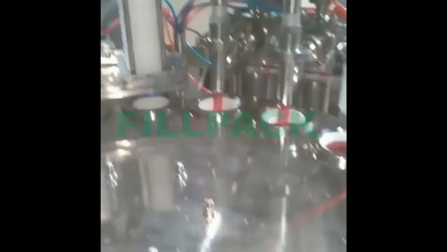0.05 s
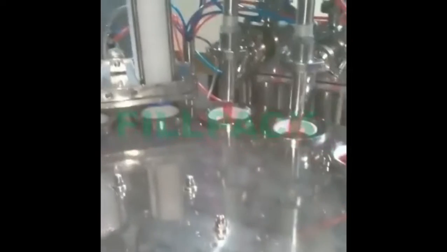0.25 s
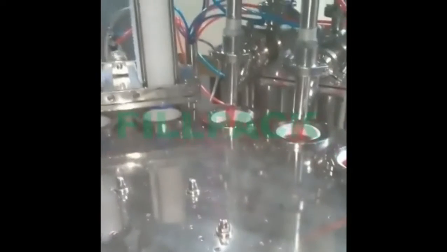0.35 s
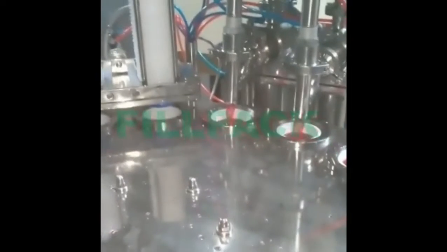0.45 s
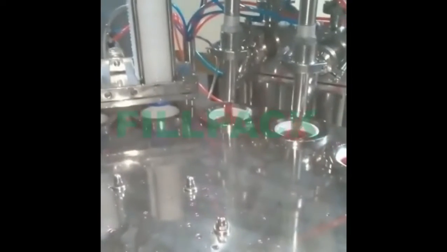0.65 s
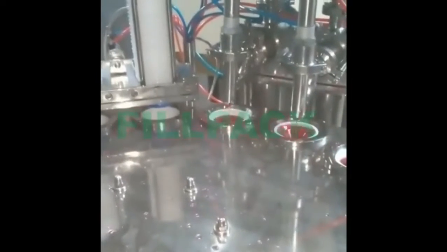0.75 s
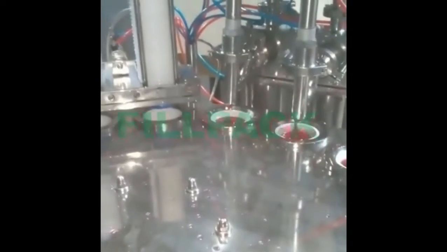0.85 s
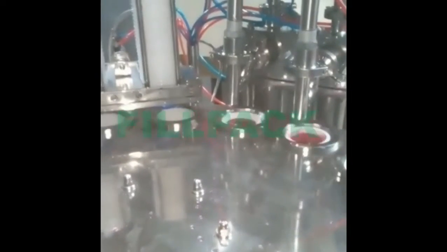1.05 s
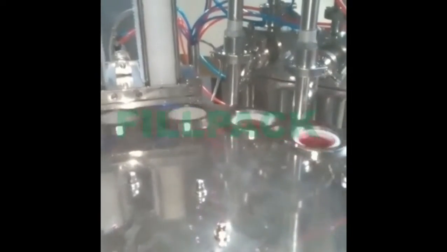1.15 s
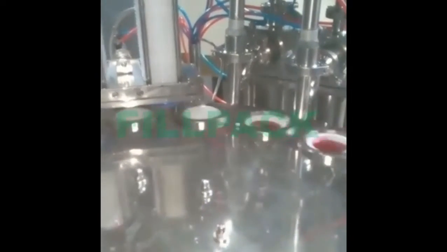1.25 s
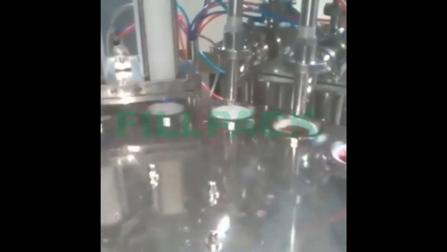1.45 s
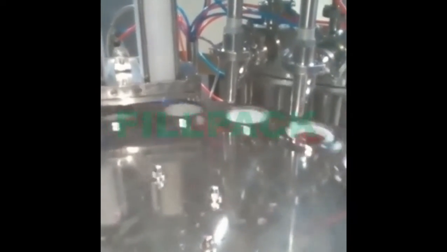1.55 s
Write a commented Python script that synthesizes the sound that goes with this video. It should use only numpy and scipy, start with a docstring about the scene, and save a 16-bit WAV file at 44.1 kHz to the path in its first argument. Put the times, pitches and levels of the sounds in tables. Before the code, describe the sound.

A filling and sealing machine clanks and hisses compressed air over a steady low factory hum

```python
"""Out of a quick fade-in come a factory hall's noise and hum, a rumbling drive and whistling bled air.
An automatic filling and sealing machine works close by: thuds through its base are soft low rings,
cylinders clunk on stops as rattling contacts ring steel modes under a noise crack, and air spits.
Two valves exhaust as bright shaped noise with gliding whistles; only the blows and spits echo.
One microphone hears it all, with the deepest bass and the extreme top cut."""
import sys
import numpy as np
from scipy import signal
from scipy.fft import rfft, irfft
from scipy.io import wavfile

SR = 44100
rng = np.random.default_rng(int(sys.argv[2]) if len(sys.argv) > 2 else 0)


def log_audio(samples):
    """Write samples as a 16-bit WAV file to the path given in sys.argv[1]."""
    # one column per channel
    frames = np.atleast_2d(samples).T
    # limit to full scale, then quantise
    limited = np.clip(frames, -1, 1)
    pcm = np.round(limited * 32767).astype(np.int16)
    wavfile.write(sys.argv[1], SR, pcm)


N = 70560

# Hall noise colour: pitch_hz [Hz], density_db [dB per Hz, relative]
HALL_COLOUR = [(18, -59), (30, -31), (44, -11), (88, -9), (133, 1), (152, -8), (225, -3.5), (270, 1.5),
               (300, 2.5), (333, -1), (444, -3), (481, -5.5), (855, -11.5), (1230, -14), (1870, -15.5),
               (5480, -21), (6750, -26), (12000, -13), (15600, -13.5)]
# Rumble of drive and frame: start_s [s], level_db [dB], tilt_db [dB per octave]
DRIVE_FLOW = [(.1, -32, 1), (.3, -31, -0.5), (.37, -29.5, -1.5), (.41, -28.5, 0.5), (.46, -28, -0.5),
              (.5, -30, 1), (.54, -33, 0.5), (.59, -30, 1), (.62, -32.5, -0.5), (.68, -30, 0.5),
              (.72, -43, 1), (.85, -41.5, 1), (.92, -48.5, 2), (.94, -34, 0.5), (1.0, -32.5, -1),
              (1.1, -37.5, -0.5), (1.14, -44, -0.5), (1.2, -38.5, -1), (1.25, -43, -0.5), (1.6, -48, -1)]
# Rumble colour: pitch_hz [Hz], density_db [dB per Hz, relative]
DRIVE_SPECTRUM = [(18, -44), (30, -34), (80, 0), (229, -1), (715, -8.5), (1210, -10), (1480, -13),
                  (1660, -12), (2510, -15), (3780, -14.5), (7000, -24.5), (9100, -42), (15400, -120)]
# Soft thuds through the base: start_s [s], level_db [dB before softening], pitch_hz [Hz], t60_s [s]
BASE_THUDS = [(0.092, -10, 122, 0.019), (0.16, -17, 57, 0.055), (0.336, -28, 62, 0.11),
              (0.384, -32.5, 100, 0.6), (0.488, -23, 104, 0.16), (0.526, -28.5, 61, 0.13),
              (.83, -31.5, 123, 0.18), (1.0817, -25, 118.7, 0.2), (1.083, -24.5, 202, 0.084),
              (1.153, -29.5, 262.7, 0.24), (1.2, -33, 208, 0.1)]
# Air flow from a bleeding line: start_s [s], level_db [dB], tilt_db [dB per octave]
BLEED_FLOW = [(.1, -32, 3), (.2, -31, 0), (.3, -32.5, -0.5), (.37, -28, 1), (.42, -35.5, 0),
              (.5, -43.5, -2), (.55, -64, 0)]
# Bleed colour: pitch_hz [Hz], density_db [dB per Hz, relative]
BLEED_SPECTRUM = [(1180, -37), (2000, -18), (3000, -24), (3620, 1.5), (4300, -1.5), (5370, -5), (6220, -6),
                  (7840, -7.5), (8260, -3), (9080, -7), (10100, 0), (11100, -7), (12200, 1), (13600, -17.5),
                  (15600, -5.5)]
# Whistles of the bleeding line: start_s [s], end_s [s], start_hz [Hz], end_hz [Hz],
# width_hz [Hz, corner of each waver pole], level_db [dB relative to the jet]
BLEED_TONES = [(.1, .45, 9980, 9840, 120, -10), (.1, .45, 11860, 11860, 120, -13)]
# Air flow of the first exhaust: start_s [s], level_db [dB], tilt_db [dB per octave]
FIRST_FLOW = [(.3085, -62, 5), (.3105, -17, 15), (.32, -21, 6), (.328, -14, -2), (.336, -17.5, 0),
              (.35, -22, -3.5), (.376, -40.5, 2), (.4, -55, -7)]
# First exhaust colour: pitch_hz [Hz], density_db [dB per Hz, relative]
FIRST_SPECTRUM = [(880, -46), (1500, -27), (2010, -19), (2310, -24), (2780, -10.5), (3800, -9), (4410, -15),
                  (6990, -9), (7780, -10), (10900, -0.5), (15600, -7.5)]
# Whistles of the first nozzle: start_s [s], end_s [s], start_hz [Hz], end_hz [Hz],
# width_hz [Hz, corner of each waver pole], level_db [dB relative to the jet]
FIRST_TONES = [(.306, .325, 11000, 8400, 250, -12), (.32, .345, 7400, 5700, 440, -12),
               (.32, .36, 10600, 12000, 200, -9), (.306, .335, 12200, 12400, 220, -9)]
# Stops struck: start_s [s], frame_db [dB], rattle_s [s], tilt_db [dB per octave],
# part_hz [Hz, pitch of the part struck], part_db [dB], crack_db [dB before filtering], crack_top_hz [Hz]
STOPS = [(.323, -23, .015, -2, 3000, -34, -27, 5000), (.389, -12, .002, -2, 670, -14, -21, 4500),
         (.3914, -13, .004, -4, 2885, -23, -23, 4500), (.421, -23, .003, -5, 800, -36, -36, 1500),
         (.485, -24, .015, -3, 2100, -36, -30, 5000), (.516, -26, .004, 0, 6200, -34, -27, 7000),
         (.565, -28, .02, -2, 1500, -38, -31, 3000), (.6545, -16, .004, -1, 4700, -23, -16, 9000),
         (.66, -22, .006, -3, 600, -22, -24, 6000), (.932, -28, .012, -3, 700, -36, -33, 1800),
         (.948, -29, .012, -2, 1300, -34, -33, 2500), (.971, -28, .006, -1, 1400, -32, -32, 6000),
         (.978, -28, .005, -1, 2700, -28, -27, 4500), (1.0445, -30, .002, 1, 2200, -26, -23, 3200),
         (1.048, -30, .004, -1, 1400, -30, -32, 3000), (1.151, -40, .006, 2, 3100, -35, -38, 6000)]
# Modes of the steel frame: pitch_hz [Hz], level_db [dB], t60_s [s]
FRAME_MODES = [(234, -14.5, 0.064), (356, -5, 0.062), (421.4, -2, 0.07), (670, -1.5, 0.045),
               (831, -5.5, 0.049), (1108, -3.5, 0.029), (1357, -2.5, 0.034), (1654, -5.5, 0.039),
               (2360, -10, 0.035), (2850, -6, 0.056), (3230, -6, 0.031), (3760, -3.5, 0.027),
               (4220, -6, 0.04), (5320, -11, 0.035), (6050, -10, 0.027)]
# Short spits of air: start_s [s], level_db [dB before filtering], t60_s [s], lowest_hz [Hz]
AIR_SPITS = [(0.3298, -10.5, 0.0014, 5100), (1.151, -28, 0.11, 2740), (1.163, -22, 0.037, 7100),
             (1.205, -30, 0.034, 6800)]
# Air flow of the second exhaust: start_s [s], level_db [dB], tilt_db [dB per octave]
SECOND_FLOW = [(.509, -54, 2), (.5125, -30, 7), (.5155, -14.5, 6), (.519, -13.5, 9), (.526, -21.5, 9),
               (.534, -15.5, 5), (.546, -19.5, 1.5), (.56, -21, 8.5), (.586, -17, 1), (.606, -18, 1.5),
               (.644, -18, -1), (.678, -21, 3), (.704, -23, -0.5), (.746, -28.5, -0.5), (.82, -32.5, -1.5),
               (.95, -42, -2), (1.05, -42, 0)]
# Second exhaust colour: pitch_hz [Hz], density_db [dB per Hz, relative]
SECOND_SPECTRUM = [(880, -48), (1500, -20), (1690, -17), (2520, -19), (2810, -12), (3130, -14),
                   (3840, -8.5), (4670, -9.5), (5160, -7.5), (5970, -12.5), (8090, -8.5), (11600, -2.5),
                   (15600, -7.5)]
# Whistles of the second nozzle: start_s [s], end_s [s], start_hz [Hz], end_hz [Hz],
# width_hz [Hz, corner of each waver pole], level_db [dB relative to the jet]
SECOND_TONES = [(.518, .54, 5300, 7000, 200, -10), (.53, .575, 7400, 7000, 250, -9),
                (.515, .55, 15500, 15500, 200, -9), (.56, .585, 13140, 13140, 80, -9),
                (.56, .66, 11300, 11550, 100, -9), (.585, .65, 12100, 12200, 100, -11),
                (.58, .63, 10650, 10700, 100, -11), (.575, .63, 5300, 5100, 250, -15),
                (.575, .61, 2200, 4200, 300, -19), (.6, .66, 3800, 3900, 400, -20),
                (.52, .56, 14300, 14300, 150, -11)]

HALL_DB = -35.5
HUM_HZ, HUM_DB, HUM_T60_S = 100, -53.5, 0.225
WHISTLE_EDGE_S = 0.012
RATTLE_PER_S, PART_T60_S = 1200, 0.032
CRACK_T60_S, CRACK_LOW_HZ = 0.057, 845
ECHO_T60_S, ECHO_CUT_HZ, ECHO_DB = 0.45, 7100, -22
FADE_START_S, FADE_LENGTH_S, FADE_FLOOR = 0.099, 0.2, 0.11  # length of a full 0-to-1 rise; floor is a gain
MIC_LOW_HZ, MIC_TOP_HZ = 47, 15700


def from_db(db):
    """Decibels to gain."""
    return 10 ** (np.asarray(db) / 20)


def rms_one(x):
    """Scale to an RMS of 1."""
    return x / np.sqrt(np.mean(x ** 2) + 1e-20)


def in_time(rows):
    """Draw each column after the first as a straight-line curve over time."""
    start_s, *columns = np.transpose(rows)
    return [np.interp(np.arange(N) / SR, start_s, column) for column in columns]


def filtered(x, order, hz, kind):
    """Butterworth filter."""
    return signal.sosfilt(signal.butter(order, hz, kind, fs=SR, output="sos"), x)


def drift(rate_hz):
    """Slow chance, spread 1: noise through two low-pass poles, made at a fortieth of the sample rate."""
    r = np.exp(-2 * np.pi * rate_hz * 40 / SR)
    noise = rng.standard_normal(N // 40 + 2002)
    slow = rms_one(signal.lfilter([1], [1, -2 * r, r * r], noise)[2000:])  # drop the settling
    return np.interp(np.arange(N) / 40, np.arange(len(slow)), slow)


def ring(clicks, hz, t60_s):
    """A damped resonance: a unit click sets a sine of starting height 1 ringing."""
    r = from_db(-60 / (t60_s * SR))
    w = 2 * np.pi * hz / SR
    return signal.lfilter([0, np.sin(w)], [1, -2 * r * np.cos(w), r * r], clicks + 1e-18)


def coloured(spectrum, patchy_db, tilt_db=0, pivot_hz=10000):
    """Coloured noise in half-octave parts, each flickering by itself; the tilt turns about the pivot."""
    hz = np.maximum(np.fft.rfftfreq(N, 1 / SR), 1)
    points_hz, density_db = np.transpose(spectrum)
    colour_db = np.interp(np.log(hz), np.log(points_hz), density_db, left=-90)
    shaped = rfft(rng.standard_normal(N)) * from_db(colour_db)
    shaped = shaped / np.std(irfft(shaped, N))
    out = 0
    for centre_hz in 16000 / 2 ** np.arange(0, 10, 0.5):
        overlap = np.clip(1 - 2 * abs(np.log2(hz / centre_hz)), 0, 1)
        part = irfft(shaped * overlap, N)
        part_db = patchy_db * drift(21) + tilt_db * np.log2(centre_hz / pivot_hz)
        out = out + part * from_db(part_db)
    return out


def motor_hum():
    """Noise drives a narrow resonance, so the motor's hum wavers."""
    return from_db(HUM_DB) * rms_one(ring(rng.standard_normal(N), HUM_HZ, HUM_T60_S))


def hall_noise():
    """Steady broad noise of the hall, flickering slightly."""
    return from_db(HALL_DB) * coloured(HALL_COLOUR, patchy_db=0.76)


def drive_rumble():
    """Drive and frame rumble as low coloured noise that swells and shifts in tone."""
    level_db, tilt_db = in_time(DRIVE_FLOW)
    return from_db(level_db) * coloured(DRIVE_SPECTRUM, patchy_db=1.4, tilt_db=tilt_db, pivot_hz=300)


def thuds():
    """One push per thud rings a low mode of the base; a gentle low-pass softens it."""
    out = 0
    for start_s, level_db, hz, t60_s in BASE_THUDS:
        push = 1.0 * (np.arange(N) == int(start_s * SR))
        out = out - from_db(level_db) * ring(push, hz, t60_s)
    return signal.lfilter([0.05], [1, -0.95], out)


def whistle(start_s, end_s, start_hz, end_hz, width_hz):
    """A noisy whistle: slow complex noise rides on a gliding carrier."""
    t = np.arange(N) / SR
    r = np.exp(-2 * np.pi * width_hz / SR)
    glide_hz = np.interp(t, [start_s, end_s], [start_hz, end_hz])
    carrier = np.exp(2j * np.pi * np.cumsum(glide_hz) / SR)
    noise = [1, 1j] @ rng.standard_normal((2, N))
    waver = signal.lfilter([1], [1, -2 * r, r * r], noise)
    edges = np.clip(np.minimum(t - start_s, end_s - t) / WHISTLE_EDGE_S, 0, 1)
    return edges * rms_one((carrier * waver).real)


def exhaust(flow, colour, whistles):
    """Escaping air: bright jet noise plus whistles, both riding the flow's level curve."""
    level_db, tilt_db = in_time(flow)
    jet = coloured(colour, patchy_db=1.7, tilt_db=tilt_db)
    for *path, whistle_db in whistles:
        jet = jet + from_db(whistle_db) * whistle(*path)
    return from_db(level_db) * jet


def clunks():
    """A blow and its rattle of contacts ring the frame and the part struck, with a broad noise crack."""
    out = np.zeros(N + SR)
    t = np.arange(SR // 4) / SR
    for start_s, frame_db, rattle_s, tilt_db, part_hz, part_db, crack_db, crack_top_hz in STOPS:
        chance = rng.random(len(t)) < RATTLE_PER_S / SR
        touches = chance * np.clip((rattle_s - t) * SR, 0, 1) * rng.normal(0, 0.32, len(t))
        touches[0] = 1  # the first blow
        touches = touches / np.sqrt(np.sum(touches ** 2))
        body = 0
        for k, (hz, mode_db, t60_s) in enumerate(FRAME_MODES):
            level_db = frame_db + mode_db + tilt_db * np.log2(hz / 400)
            body = body + (-1) ** k * from_db(level_db) * ring(touches, hz, t60_s)
        part = from_db(part_db) * ring(touches, part_hz, PART_T60_S)
        # the crack holds its level through the rattle, then dies away
        decay_db = -60 * np.maximum(t - rattle_s, 0) / CRACK_T60_S
        burst = rng.standard_normal(len(t)) * from_db(crack_db + decay_db)
        crack = filtered(burst, 2, [CRACK_LOW_HZ, crack_top_hz], "band")
        out[int(start_s * SR):][:len(t)] += body + part + crack
    return out[:N]


def spits():
    """Sudden puffs of air: high-passed noise that starts at once and decays exponentially."""
    out, t = 0, np.arange(N) / SR
    for start_s, level_db, t60_s, lowest_hz in AIR_SPITS:
        decay_db = -60 * np.maximum(t - start_s, 0) / t60_s
        puff = rng.standard_normal(N) * (t >= start_s) * from_db(level_db + decay_db)
        out = out + filtered(puff + 1e-18, 4, lowest_hz, "high")
    return out


def echoes(x):
    """Ten feedback delays of alternating sign, each duller on every round."""
    out, dull = 0, np.exp(-2 * np.pi * ECHO_CUT_HZ / SR)
    lags = (rng.uniform(0.013, 0.045, 10) * SR).astype(int)
    for k, lag in enumerate(lags):
        gain = from_db(-60 * lag / SR / ECHO_T60_S)
        loop, state = x.copy(), [0.0]
        for i in range(lag, N, lag):
            back, state = signal.lfilter([gain * (1 - dull)], [1, -dull], loop[i - lag:i], zi=state)
            loop[i:i + lag] += back[:N - i]
        out = out + (loop - x) * (-1) ** k
    return out


def scene():
    """Blows with their echoes, air and background meet at one microphone."""
    blows = clunks() + thuds() + spits()
    first = exhaust(FIRST_FLOW, FIRST_SPECTRUM, FIRST_TONES)
    second = exhaust(SECOND_FLOW, SECOND_SPECTRUM, SECOND_TONES)
    bleed = exhaust(BLEED_FLOW, BLEED_SPECTRUM, BLEED_TONES)
    echoed_blows = blows + from_db(ECHO_DB) * echoes(blows)
    background = motor_hum() + hall_noise() + drive_rumble()
    mono = echoed_blows + first + second + bleed + background
    return np.array([mono, mono])


def record(dry):
    """Cut the deepest bass, fade in with a faint bass lead of 8 ms, then cut the top steeply."""
    t = np.arange(N) / SR
    dry = filtered(dry, 3, MIC_LOW_HZ, "high")
    rise = FADE_FLOOR + (t - FADE_START_S) / FADE_LENGTH_S
    fade = (t > FADE_START_S) * np.clip(rise, 0, 1)
    lead = (t > FADE_START_S - 0.008) * (t <= FADE_START_S)
    bass = filtered(dry * lead, 2, 500, "low")
    top_cut = signal.ellip(12, 0.5, 70, MIC_TOP_HZ, fs=SR, output="sos")
    return signal.sosfilt(top_cut, dry * fade + FADE_FLOOR * bass)


dry = scene()
out = record(dry)
log_audio(out)
```